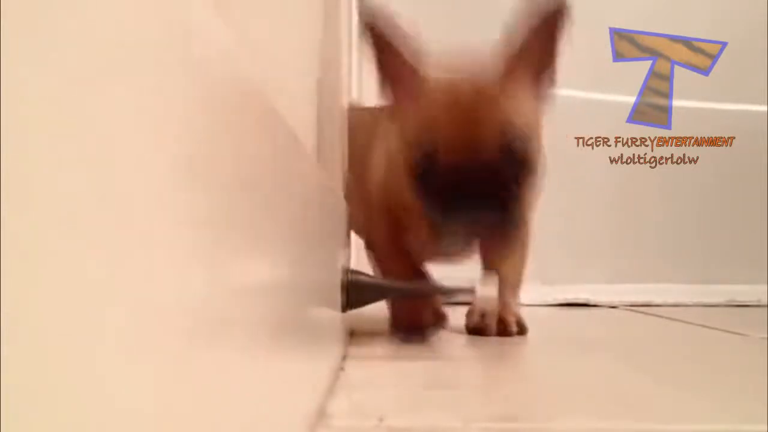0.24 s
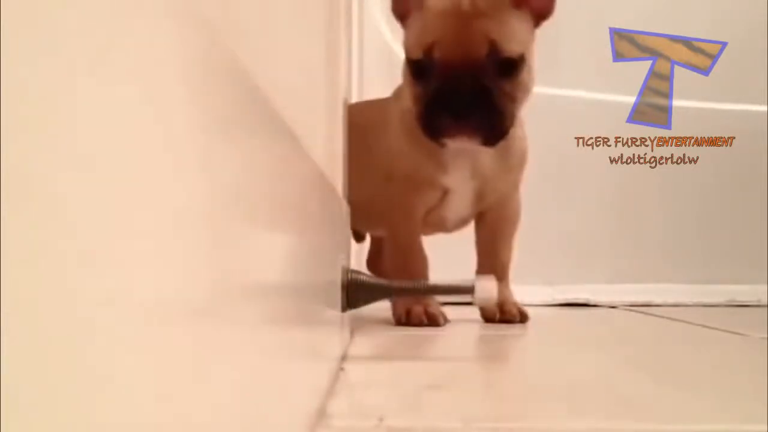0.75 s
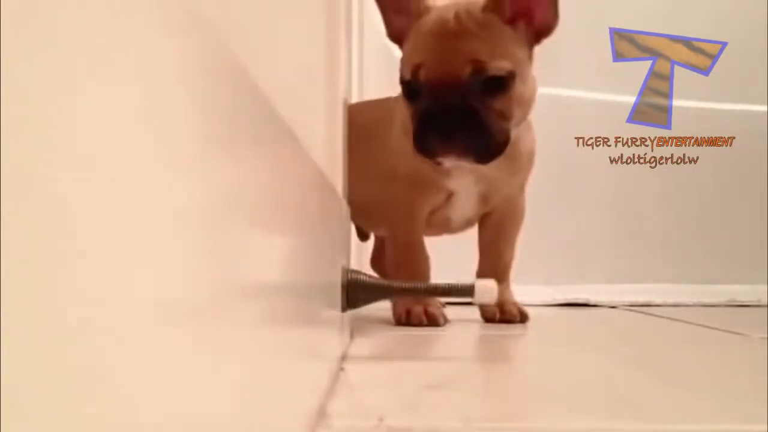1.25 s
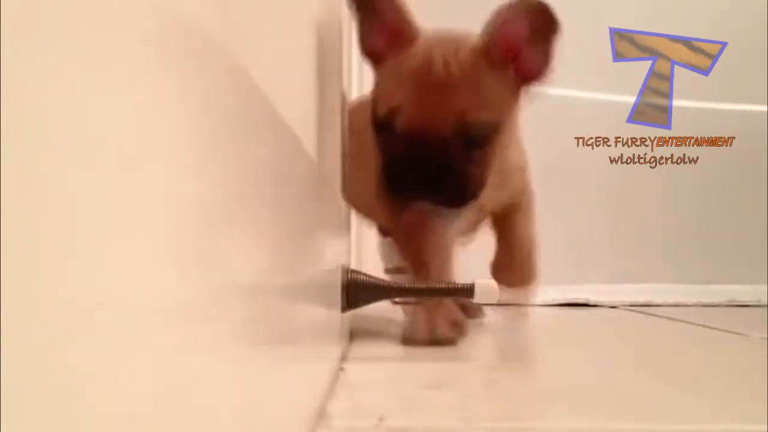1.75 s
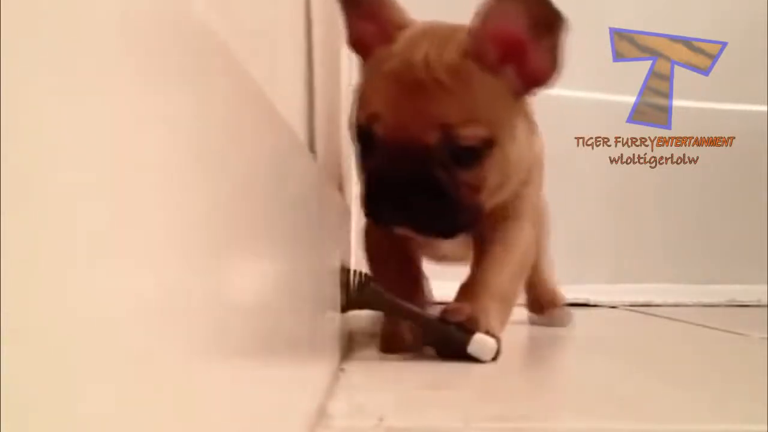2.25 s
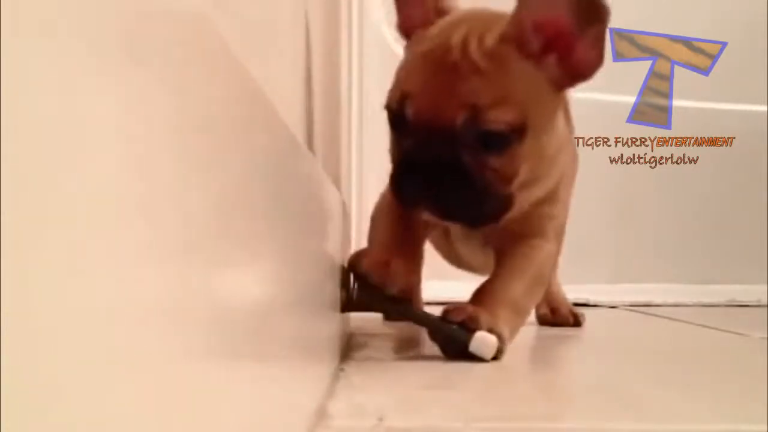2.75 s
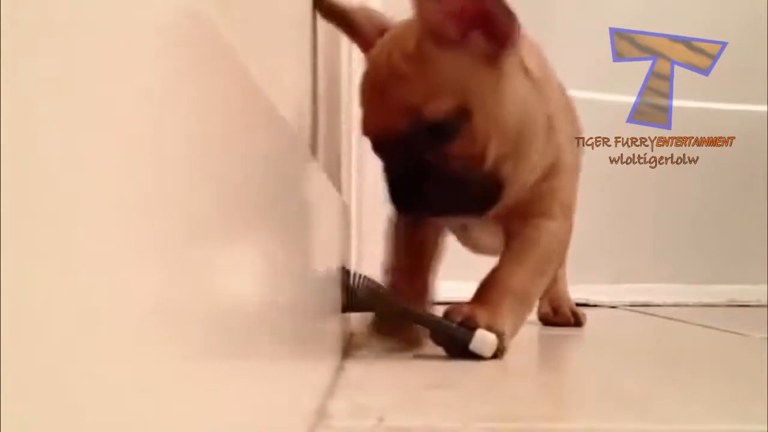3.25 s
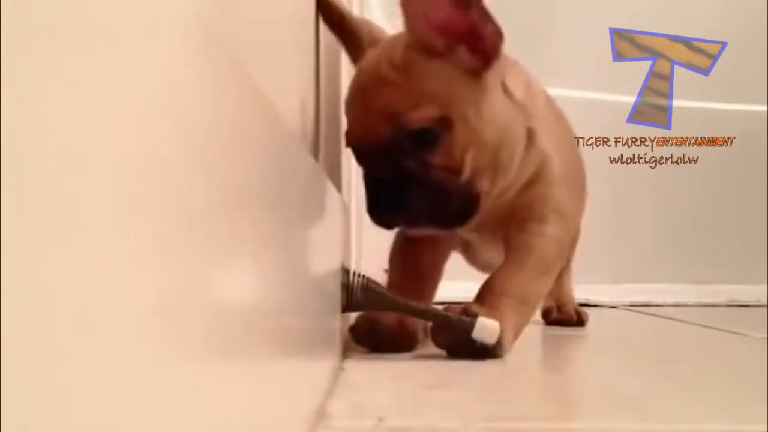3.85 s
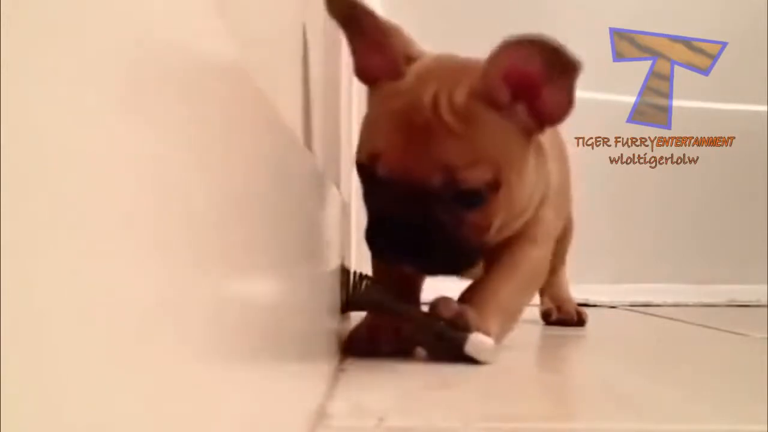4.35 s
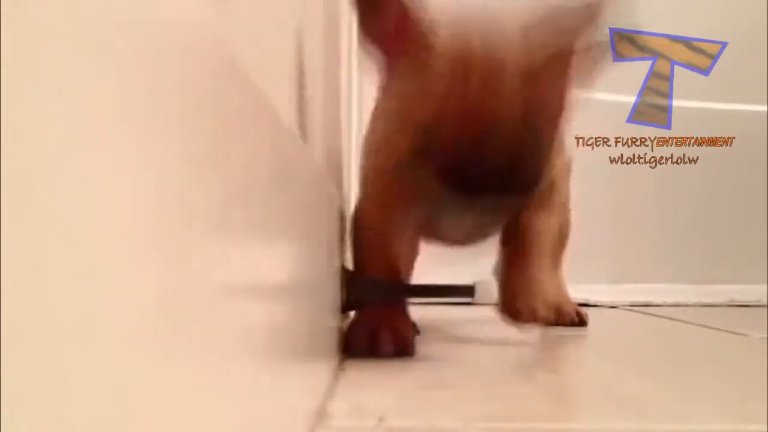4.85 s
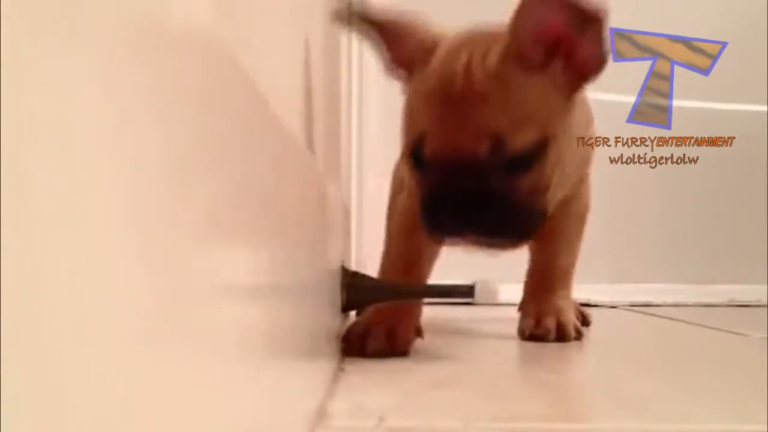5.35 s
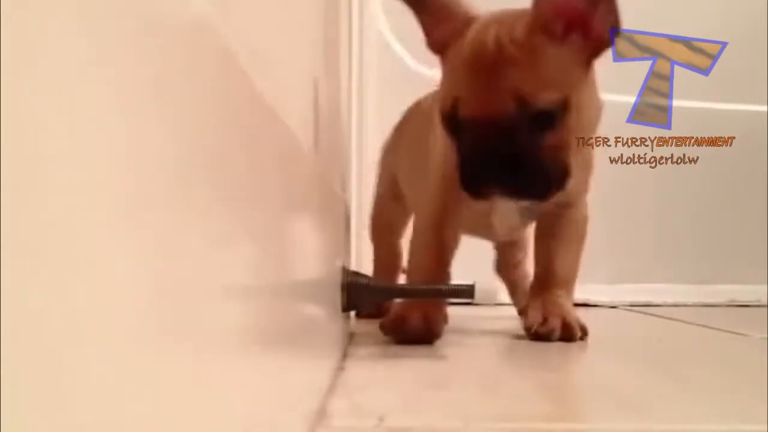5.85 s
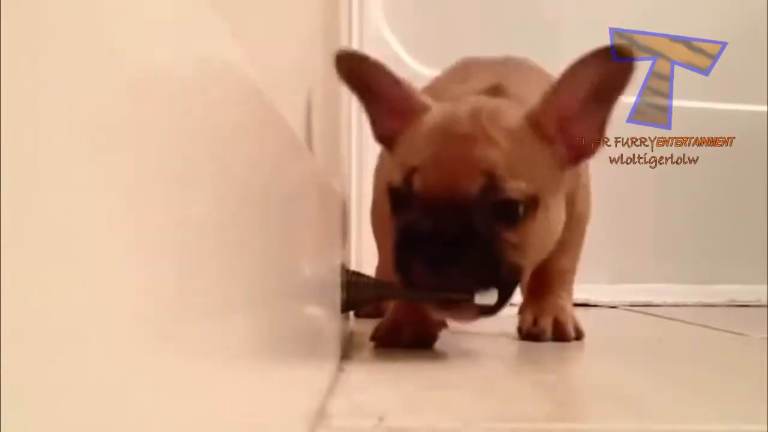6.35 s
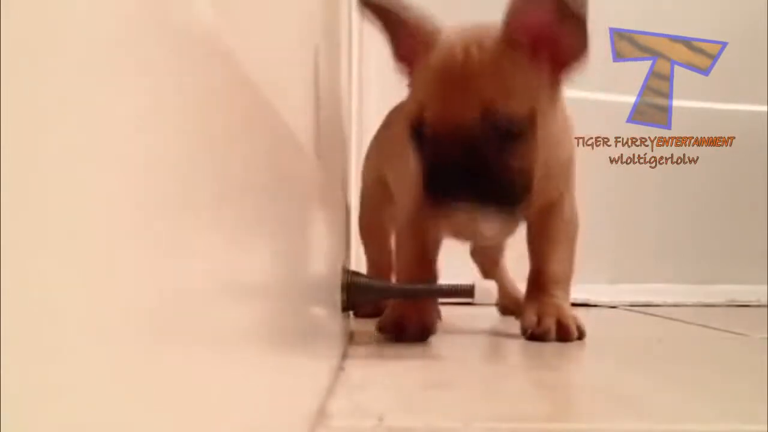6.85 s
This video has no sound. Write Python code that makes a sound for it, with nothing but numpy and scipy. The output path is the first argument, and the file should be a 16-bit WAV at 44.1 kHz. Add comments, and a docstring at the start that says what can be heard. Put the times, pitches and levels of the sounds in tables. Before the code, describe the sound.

Springy door stop whips and rattles into a fluttering boing, then claw clicks, scrapes and a second shorter twang in a small tiled room.

```python
"""Tiled floor by a door: a puppy paws and mouths a spring door stop, over mains hum and soft air.
Let go twice, the spring whips, its coils clash, and it settles into a buzzing swing that rings in the door.
Around the twangs: base slaps, claw clicks, nudges, paws rubbing on the coils, sniffs.
Blows are filtered chirps plus chatter noise; rubs, sniffs and air are coloured noise; hum and pings are sines.
Spring, slaps and nudges ring the door; these, claw clicks, rubs and sniffs stir a diffuse room."""
import sys
import numpy as np
from scipy import signal
from scipy.fft import rfft, irfft
from scipy.io import wavfile

SR = 44100
rng = np.random.default_rng(int(sys.argv[2]) if len(sys.argv) > 2 else 0)


def inscribe(sig):
    """Save sig as 16-bit PCM at rate SR to the path in sys.argv[1].

    A 1-D sig is mono; a 2-D sig holds one channel per row.
    Samples are clipped to [-1, 1] before scaling.
    """
    pcm = np.round(np.clip(np.atleast_2d(sig).T, -1, 1) * 32767)
    wavfile.write(sys.argv[1], SR, pcm.astype(np.int16))


N = 313551  # samples

# Event and colour levels are relative: layer trims and later stages follow.
# mains hum and a motor's drone: f/Hz, level/dB, waver depth 0-1
HUM_LINES = [(120.2, -56, 0.25), (211.5, -62, 0.92), (244.5, -64, 0.35), (273.4, -73.5, 0.8)]
# rush of air, spectrum: f/Hz, level/dB
AIR_COLOUR = [(30, -43), (70, -26), (110, -21.5), (160, -1), (225, -1), (310, -2.5), (400, -8), (550, -19),
              (1000, -23.5), (1700, -19), (4000, -25.5), (6800, -24), (9500, -35.5), (14500, -31)]
# paws dragging along the coils: t/s, length/s, rasp/dB, fizz/dB
RUB_STROKES = [(0.005, 0.081, -64.5, -61), (0.494, 0.11, -51, -50), (1.765, 0.057, -60, -104),
               (2.116, 0.21, -59.5, -60.5), (2.378, 0.071, -58, -61), (2.753, 0.064, -56, -53),
               (2.794, 0.12, -59, -62), (2.907, 0.1, -55.5, -65), (3.22, 0.12, -56, -66.5),
               (3.284, 0.13, -64, -65), (3.406, 0.076, -62, -70), (3.598, 0.093, -46.5, -57),
               (3.73, 0.13, -57, -60), (3.97, 0.09, -48, -55.5), (4.798, 0.069, -60.5, -74),
               (4.906, 0.25, -67.5, -64), (5.116, 0.035, -40, -42), (6.186, 0.034, -58.5, -83)]
# rub spectra, rasp and fizz: f/Hz, level/dB
RASP_COLOUR = [(300, -1), (900, 5), (1400, 10.5), (1950, 12), (2700, 11.5), (3400, 3.5), (4400, 13),
               (5200, -22), (6500, -12.5)]
FIZZ_COLOUR = [(3500, -16.5), (5500, 3), (7700, 6.5), (9500, -1.5), (12000, 7.5), (15000, -9)]
# soft bumps of muzzle and paw on the stop: t/s, thump/dB, knock/dB, clack/dB, tick/dB
NUDGE_BLOWS = [(0.016, -33, -39.5, -49.5, -47), (0.031, -44, -54, -49, -50), (0.044, -36, -37.5, -61, -60),
               (0.347, -35.5, -43.5, -50.5, -48), (0.519, -34.5, -40, -46, -55),
               (2.169, -39, -64, -48, -55), (2.891, -49, -48, -41.5, -58), (3.472, -51, -52, -52.5, -66),
               (3.863, -42.5, -47.5, -43.5, -59), (4.451, -41, -48, -57, -57),
               (4.468, -36.5, -42, -54, -53), (5.923, -33.5, -41, -52, -53), (5.938, -36, -47, -65, -66),
               (5.946, -40, -32.5, -46, -55), (6.6853, -36, -41, -50, -60),
               (6.9083, -39, -46.5, -50.5, -51)]
# mount spectrum: f/Hz, level/dB
MOUNT_COLOUR = [(60, -41), (130, -18), (240, -1.5), (380, 9.5), (510, -2), (640, -0.5), (860, -13.5),
                (1200, -14), (1600, -17), (2000, -18), (2450, -23), (2800, -31), (3600, -21), (4300, -12.5),
                (5400, -23.5), (7500, -8), (9700, -22), (14000, -22.5)]
# puppy's sniffs: t/s, length/s, level/dB
SNIFF_STROKES = [(0.2, 0.15, -63), (0.295, 0.11, -50.5), (2.62, 0.13, -65), (2.85, 0.1, -58),
                 (4.39, 0.067, -60.5), (4.44, 0.23, -61), (5.85, 0.079, -67), (6.02, 0.15, -57.5),
                 (6.55, 0.095, -61), (6.91, 0.1, -59)]
# nose spectrum: f/Hz, level/dB
NOSE_COLOUR = [(1500, -2), (3000, -4.5), (5800, 2.5), (8500, 3), (12000, 6.5), (15000, -8)]
# coil collisions and base jolts in mid swing: t/s, thump/dB, knock/dB, clack/dB, tick/dB
CLASH_BLOWS = [(0.5283, -15, -18.5, -19.5, -18), (0.5698, -17, -32, -26, -19.5),
               (0.5900, -20.5, -19.5, -31, -33), (0.6062, -17.5, -42, -36, -42),
               (0.6403, -17, -22.5, -28, -19), (0.6555, -21.5, -17, -13.5, -32),
               (0.6705, -30, -34, -37, -38), (0.6745, -21, -27, -39, -24.5), (0.6948, -20, -28, -46, -28),
               (0.7188, -19.5, -24, -22.5, -44), (0.7538, -29, -28, -54, -29),
               (0.7745, -26.5, -22, -26, -28), (0.8125, -24, -24, -34, -23.5), (1.2435, -44, -33, -52, -62),
               (1.2700, -26, -46, -57, -62), (1.3015, -31, -50, -51, -61), (5.1595, -17, -29, -34, -25.5),
               (5.176, -20, -40, -34, -52), (5.1972, -20, -25, -33, -36), (5.2243, -24, -22.5, -28.5, -38),
               (5.2635, -25, -38, -36, -30.5), (5.2918, -28, -28, -33, -44), (5.3118, -26, -22.5, -41, -44),
               (5.3295, -22.5, -29.5, -27.5, -34.5), (5.3618, -28.5, -26.5, -37, -33),
               (5.429, -36, -33, -46, -53), (5.4575, -34, -35.5, -48, -71)]
# spring spectrum: f/Hz, level/dB
SPRING_COLOUR = [(60, -77), (130, -26.5), (240, -5.5), (380, 3), (490, -6), (650, -6), (930, -19),
                 (1400, -13), (1650, -19.5), (1900, -15), (2400, -20.5), (3200, -25.5), (4400, -16),
                 (5400, -27), (7700, -12), (9500, -26), (14800, -23.5)]
# swing rate, long and short twang; a free swing quickens as it narrows: t/s, swing rate/Hz
LONG_SWING_RATE = [(0.529, 23.94), (0.62, 23.63), (0.92, 28.28), (1.2, 31.08), (1.43, 37.39), (1.47, 28.96),
                   (1.51, 39.46), (1.76, 37.32)]
SHORT_SWING_RATE = [(5.399, 33.3), (5.46, 34.5), (5.86, 35)]
# force of the swing, long and short twang: t/s, boom/dB, coil rattle/dB, coil tick/dB
LONG_SWING_FORCE = [(0.529, -28.5, -29, -41), (0.62, -37, -39, -37), (0.68, -30, -40, -34),
                    (0.78, -33.5, -32.5, -34), (1.0, -34.5, -28.5, -31), (1.24, -37, -35.5, -36),
                    (1.3, -29, -35.5, -29.5), (1.38, -41, -36.5, -39), (1.48, -46.5, -54.5, -49),
                    (1.535, -40.5, -40.5, -45), (1.58, -44, -56, -54.5), (1.66, -78, -85, -57),
                    (1.759, -76, -90, -65)]
SHORT_SWING_FORCE = [(5.399, -35, -44, -54), (5.44, -48, -53, -68), (5.512, -47, -59, -83),
                     (5.686, -60, -63.5, -77), (5.86, -58, -99, -94)]
# back stroke crowding in on the out stroke: t/s, delay/share of a swing, back stroke level/dB
LONG_BACK_STROKE = [(0.53, .5, 0), (0.7, .46, -1), (0.87, .385, 1), (1.02, .345, 1), (1.19, .32, -3),
                    (1.25, .24, -7), (1.34, .24, -2), (1.76, .17, -3)]
SHORT_BACK_STROKE = [(5.4, .48, -5), (5.86, .45, -8)]
# wire and mount mode clusters: t/s, f/Hz, half-width/Hz, level/dB, t60/s, struck squarely 0-1
PING_CLUSTERS = [(0.6574, 1460, 800, -43, 0.11, 1), (1.319, 2036, 906, -32, 0.35, 0.1),
                 (1.516, 2050, 974, -43.5, 0.38, 0.1), (1.539, 4230, 484, -57.5, 0.76, 0.1),
                 (1.54, 7650, 810, -73, 1, 0), (2.3165, 554, 251, -41, 0.1, 0.8),
                 (2.316, 2003, 796, -38, 0.27, 0.6), (2.768, 14200, 1000, -51, 0.38, 0),
                 (3.659, 2910, 272, -36, 0.25, 0.5), (3.66, 14000, 2400, -47, 0.069, 0),
                 (4.051, 12600, 4960, -33, 0.079, 0.3), (4.576, 948, 390, -31.5, 0.11, 0.8),
                 (4.577, 2264, 700, -36.5, 0.17, 0.1), (4.584, 4450, 550, -38, 0.16, 0.34),
                 (5.42, 650, 150.4, -41.5, 1.0, 0.14), (5.9484, 634, 167, -41, 0.21, 0.7),
                 (6.687, 440, 234, -45, 0.2, 0.24), (6.909, 394, 162, -50.5, 0.21, 0.1)]
# base slapping back onto its mount: t/s, thump/dB, knock/dB, clack/dB, tick/dB, rebound/dB
SLAP_BLOWS = [(2.3149, -36.5, -29, -35, -32, 5.5), (4.5746, -29, -25, -29, -43, -8),
              (5.1366, -18, -21.5, -14.5, -17, 0), (5.2483, -21, -22.5, -24.5, -37, 1),
              (7.0823, -26.5, -27.5, -29.5, -32, 7)]
# claws clicking off the held wire: t/s, thump/dB, knock/dB, clack/dB, tick/dB
SNAP_BLOWS = [(2.769, -69, -69, -61, -41.5), (2.794, -69, -71, -58, -38.5), (3.25, -57, -62, -55, -65),
              (3.324, -47.5, -56, -48, -49), (3.364, -48, -54, -54, -48.5), (3.428, -57, -58, -64, -63),
              (3.635, -64, -65, -65, -61), (3.6502, -41, -45, -34.5, -23), (3.659, -40, -43, -35, -31.5),
              (3.781, -43.5, -58, -46, -51), (4.0487, -45, -50, -39, -26.5), (4.5832, -37.5, -61, -58, -30),
              (4.988, -50, -58, -73, -44), (5.077, -70, -64, -74, -58), (6.565, -70, -86, -58, -56)]
# claw click spectrum: f/Hz, level/dB
CLAW_COLOUR = [(60, -72), (170, 16), (400, 6), (900, -7.5), (2300, -2), (2900, -4), (3500, -3), (4300, 2),
               (5500, -6.5), (7700, 7.5), (10000, -11), (14500, -1.5)]
# borders between thump, knock, clack, tick: f/Hz
BORDERS_HZ = [520, 1100, 3000]
# change per returning wave, free and held wire: thump/dB, knock/dB, clack/dB, tick/dB
FREE_RETURN_DB = (-5.5, -14, -17.5, -34)
HELD_RETURN_DB = (0, -5.5, -8, -26)
# door panel modes: f/Hz, level/dB, t60/s
DOOR_MODES = [(204, 1, 0.3), (243, 2, 0.35), (274.5, -2, 0.3), (328.5, 0.5, 0.35), (388, 5.5, 0.3),
              (418, -3, 0.35), (442, -1, 0.35), (522, -1, 0.25), (596, 3, 0.25), (646, -3, 0.45),
              (728, -4, 0.45), (927, 2, 0.3), (963, 2, 0.3), (1281, 0, 0.25), (1405, 5, 0.25),
              (1927, -1, 0.25)]
# room decay: f/Hz, t60/s
ROOM_T60 = [(200, 0.46), (500, 0.33), (1500, 0.3), (3000, 0.33), (8000, 0.19), (15000, 0.29)]
# reverberation strength: f/Hz, level/dB
ROOM_WET = [(200, -5), (400, -4.5), (650, -5), (1100, -1.5), (2300, -1), (3200, 0.5), (4500, -5),
            (7000, -11), (15000, -10)]

SLIPS_PER_S = 4000
FREE_TRIP_S, HELD_TRIP_S = 0.015, 0.007  # wave round trip along the wire
EDGE_HZ = 15700


def gain_of(db):
    """Decibels to amplitude."""
    return 10 ** (np.asarray(db) / 20)


def evened(x):
    """Scales to rms 1."""
    return x / np.sqrt(np.mean(x ** 2) + 1e-20)


def read(points, hz):
    """Interpolates linearly on a log-frequency axis."""
    point_hz, value = np.transpose(points)
    return np.interp(np.log(hz + 1), np.log(point_hz + 1), value)


def add(mix, start_s, sound):
    """Mixes a sound in at start_s."""
    part = mix[max(round(start_s * SR), 0):][:len(sound)]
    part += sound[:len(part)]


def coloured(x, colour):
    """Filters x by a spectrum, at rms 1."""
    hz = np.fft.rfftfreq(len(x), 1 / SR)
    return evened(irfft(rfft(x) * gain_of(read(colour, hz)), len(x)))


def wander(hz):
    """Slow random motion up to about hz, at rms 1."""
    lowpass = np.exp(-(np.fft.rfftfreq(N, 1 / SR) / hz) ** 2)
    return evened(irfft(rfft(rng.standard_normal(N)) * lowpass, N))


def highpassed(x, lowest_hz):
    """Second-order bass cut."""
    return signal.sosfilt(signal.butter(2, lowest_hz, "highpass", fs=SR, output="sos"), x)


def strokes(rows, taper):
    """Level curve of smooth swells."""
    level = np.zeros(N)
    for start_s, length_s, db in rows:
        swell = signal.windows.tukey(max(int(length_s * SR), 2), taper)
        add(level, start_s, gain_of(db) * swell)
    return level


def causal(log_gain):
    """Minimum-phase response: starts at once, rings afterwards."""
    mirrored = np.r_[log_gain, log_gain[-2:0:-1]]
    phase = -signal.hilbert(mirrored).imag[:len(log_gain)]
    return np.exp(log_gain + 1j * phase)


def clash(levels_db, chatter_ms, colour, loose_hz, rise_ms, evenness,
          lag_ms=0.684, lag_spread=0.36, contact_s=0.005, size=2048):
    """One blow: a dispersive chirp down the wire in the bass, contact chatter above loose_hz."""
    hz, ms = np.fft.rfftfreq(size, 1 / SR), np.arange(size) * 1000 / SR
    below = [1 / (1 + (hz / border) ** 12) for border in BORDERS_HZ]
    bands = np.diff(below, axis=0, prepend=0, append=1)
    power = bands * gain_of(read(colour, hz)) ** 2
    power = gain_of(levels_db) ** 2 @ (power / power.mean(1, keepdims=True))
    log_gain = np.log(abs(power * contact_s * SR) + 1e-14) / 2
    # bending waves: bass trails treble; the lag, set at 1 kHz, varies per blow
    lag = lag_ms * (1 + lag_spread * rng.uniform(-1.36, 1))
    chirp_phase = -4 * np.pi * lag * np.sqrt(hz / 1000)
    # coils close one after another: chatter swells, then dies
    envelope = (1 - np.exp(-ms / rise_ms)) ** 2 * np.exp(-ms / chatter_ms)
    chatter = rng.standard_normal(size) * envelope
    chatter_spectrum = rfft(chatter / np.linalg.norm(chatter))
    loose = hz ** 2 / (hz ** 2 + loose_hz ** 2)
    drive = np.sqrt(1 - loose) * np.exp(1j * chirp_phase) + np.sqrt(loose) * chatter_spectrum
    # evenness 0 keeps the chance colour of the drive, 1 flattens most of it
    log_gain = log_gain - evenness * np.log(abs(drive) ** 2 + 0.3) / 2
    return irfft(drive * causal(log_gain))


def blows(rows, trip_s, change_db, colour, chatter_ms, loose_hz, rise_ms, evenness=0.43, count=3):
    """Separate blows, each repeated as its wave returns along the wire."""
    out = np.zeros(N)
    for start_s, *levels_db in rows:
        for trip in range(count):
            trip_db = levels_db + trip * np.array(change_db)
            blow = clash(trip_db, chatter_ms, colour, loose_hz, rise_ms, evenness)
            add(out, start_s + trip * trip_s, blow)
    return out


def background(air_db=-55.5):
    """Hum lines, wavering in amplitude and phase, over a soft rush of air."""
    t = np.arange(N) / SR
    hum = np.zeros(N)
    for hz, db, waver in HUM_LINES:
        motion = 1 + waver * (wander(7.4) + 1j * wander(5.7))
        hum += np.sqrt(2) * gain_of(db) * (np.exp(2j * np.pi * hz * t) * motion).real
    return hum + gain_of(air_db) * coloured(rng.standard_normal(N), AIR_COLOUR)


def rubbing(spread_db=2.0, rasp_db=-2, fizz_db=2.5, pressure_db=4.5, pressure_hz=45):
    """Pads and claws slip over the coils in tiny random catches, under an uneven pressure."""
    caught = rng.random(N) < SLIPS_PER_S / SR
    strength = gain_of(spread_db * np.minimum(rng.exponential(1, N), 4))
    slips = caught * rng.choice([-1, 1], N) * strength
    rasp, fizz = (strokes(np.array(RUB_STROKES)[:, [0, 1, column]], taper=0.8) for column in (2, 3))
    scrape = gain_of(rasp_db) * rasp * coloured(slips, RASP_COLOUR)
    scrape += gain_of(fizz_db) * fizz * coloured(slips, FIZZ_COLOUR)
    return scrape * gain_of(pressure_db * wander(pressure_hz))


def nudges(level_db=0.0):
    """Muzzle and paw bump the stop; the mount colours the blow."""
    return gain_of(level_db) * blows(NUDGE_BLOWS, FREE_TRIP_S, FREE_RETURN_DB, MOUNT_COLOUR,
                                     chatter_ms=1.9, loose_hz=1380, rise_ms=1.9)


def sniffing(flutter_db=1.0, flutter_hz=60, sniff_db=4.0):
    """Air noise swells and fades unevenly in small nostrils."""
    swell = strokes(SNIFF_STROKES, taper=0.9)
    flutter = gain_of(sniff_db + flutter_db * wander(flutter_hz))
    return coloured(rng.standard_normal(N), NOSE_COLOUR) * swell * flutter


def coil_clashes(level_db=-0.5):
    """Coils collide and the base jolts in mid swing; waves return along the free wire."""
    return gain_of(level_db) * blows(CLASH_BLOWS, FREE_TRIP_S, FREE_RETURN_DB, SPRING_COLOUR,
                                     chatter_ms=2.3, loose_hz=1640, rise_ms=0.47)


def swing(rate, force, back, colour, tone_db, knock_share, out_ms, back_ms, back_knock_db, uneven_db=0.43):
    """Coils close twice a swing: a long bright clash going out, a shorter rounder one coming back."""
    t = np.arange(rate[0][0], rate[-1][0], 1 / SR)
    turns = np.cumsum(np.interp(t, *np.transpose(rate))) / SR
    force_s, *force_db = np.transpose(force)
    back_s, *back_columns = np.transpose(back)
    out, rounder_db = np.zeros(N), np.array([0, back_knock_db, 0, 0])
    for k in range(int(turns[-1]) + 1):
        out_s = np.interp(k, turns, t)
        phase, back_db = (np.interp(out_s, back_s, column) for column in back_columns)
        pair = (k, -rounder_db, out_ms), (k + phase, back_db + rounder_db, back_ms)
        for turn, stroke_db, chatter_ms in pair:
            start_s = np.interp(turn, turns, t)
            boom, rattle, tick = (np.interp(start_s, force_s, db) for db in force_db)
            knock = knock_share * boom + (1 - knock_share) * rattle
            levels_db = np.array([boom, knock, rattle, tick]) + tone_db + stroke_db
            levels_db = levels_db + uneven_db * rng.standard_normal(4)
            add(out, start_s, clash(levels_db, chatter_ms, colour, loose_hz=1700, rise_ms=0.48, evenness=0))
    return out


def twangs():
    """A long bright twang on the bare coils, and a short one that shakes the mount."""
    long = swing(LONG_SWING_RATE, LONG_SWING_FORCE, LONG_BACK_STROKE, SPRING_COLOUR,
                 tone_db=(0, 1.8, 0.0, 0.57), knock_share=0.53, out_ms=2.1, back_ms=1.1, back_knock_db=2.0)
    short = swing(SHORT_SWING_RATE, SHORT_SWING_FORCE, SHORT_BACK_STROKE, MOUNT_COLOUR,
                  tone_db=(0.025, 0.5, 0.31, 0.0), knock_share=0.93, out_ms=2.1, back_ms=1.5, back_knock_db=1.5)
    return long + short


def pings(lowest_hz=260, count=40):
    """Close modes, in phase when struck squarely, beat against each other as they die away."""
    out, t = np.zeros(N), np.arange(SR * 3 // 4) / SR
    for start_s, hz, half_width_hz, db, t60_s, struck in PING_CLUSTERS:
        up, down, phase = rng.random(size=(3, count, 1))
        mode_hz = hz + half_width_hz * (up - down)
        start_turns = (phase - .5) * (1 - struck)
        cluster = np.sin(2 * np.pi * (mode_hz * t + start_turns)).sum(0)
        add(out, start_s, gain_of(db - 60 * t / t60_s) * evened(cluster))
    return highpassed(out, lowest_hz)


def base_slaps(level_db=-1.5):
    """The base slaps back onto its mount; each slap has its own rebound strength."""
    out = np.zeros(N)
    for *row, rebound_db in SLAP_BLOWS:
        out += blows([row], FREE_TRIP_S, np.add(FREE_RETURN_DB, rebound_db), MOUNT_COLOUR,
                     chatter_ms=1.5, loose_hz=1500, rise_ms=1.4, evenness=0.25)
    return gain_of(level_db) * out


def claw_snaps(level_db=-0.5):
    """Claws catch and click off the held wire, whose waves return sooner."""
    return gain_of(level_db) * blows(SNAP_BLOWS, HELD_TRIP_S, HELD_RETURN_DB, CLAW_COLOUR,
                                     chatter_ms=0.8, loose_hz=1990, rise_ms=0.25)


def door(x, ring_db, lowest_hz=110):
    """Sounding board: radiates little deep bass, and its panel modes ring on after each blow."""
    t = np.arange(SR) / SR
    ring = np.zeros(SR)
    for hz, db, t60_s in DOOR_MODES:
        unit_peak = 2 * np.log(1000) / (t60_s * SR)  # gain about 1 at resonance
        ring += gain_of(db - 60 * t / t60_s) * np.cos(2 * np.pi * hz * t) * unit_peak
    return highpassed(x + gain_of(ring_db) * signal.fftconvolve(x, ring)[:N], lowest_hz)


def room(x, wet_db, first_s=.004, shift_hz=1.9, count=4, size=512):
    """Dense noise tails, decaying per band; four take turns at a steady rate, so no fixed colour builds up."""
    out = x.copy()
    for k in range(count):
        hz, t, z = signal.stft(rng.standard_normal(SR), SR, nperseg=size)
        z = z * gain_of(-60 * t / read(ROOM_T60, hz)[:, None])
        z = z / np.linalg.norm(z, axis=1, keepdims=True) * np.sqrt(3) / size
        diffuse = signal.istft(z * gain_of(read(ROOM_WET, hz)[:, None]), SR, nperseg=size)[1]
        tail = np.r_[np.zeros(int(first_s * SR)), diffuse]
        share = np.maximum(np.cos(2 * np.pi * (shift_hz * np.arange(N) / SR + k / count)), 0)
        out += gain_of(wet_db) * signal.fftconvolve(x * share, tail)[:N]
    return out


def ports(x, lean_db=-22, lean_hz=300):
    """Two close microphone ports hear alike, but the left gets a little more of the low mids."""
    octaves = np.log2((np.fft.rfftfreq(N, 1 / SR) + 1) / lean_hz)
    side = gain_of(lean_db) * irfft(rfft(x) * np.exp(-2 * octaves ** 2), N)
    return np.array([x + side, x - side])


def scene():
    """Spring, slaps and nudges pass door and room; rubs, sniffs and claws the room; the rest neither."""
    spring = door(twangs() + coil_clashes(), ring_db=-5.5)
    slaps = door(base_slaps(), ring_db=-8)
    bumps = door(nudges(), ring_db=-10.5)
    near = room(spring + slaps + rubbing() + sniffing(), wet_db=1.2)
    touches = room(bumps + claw_snaps(), wet_db=2.0)
    return ports(near + touches + pings() + background())


def record(dry, ceiling=0.68):
    """Rounds off the loudest peaks, then limits the band."""
    rounded = dry / (1 + (dry / ceiling) ** 4) ** (1 / 4)
    lowpass = signal.firwin(161, EDGE_HZ, window=("kaiser", 9), fs=SR)
    return signal.oaconvolve(rounded, lowpass[None], "same")


dry = scene()
out = record(dry)
inscribe(out)
```